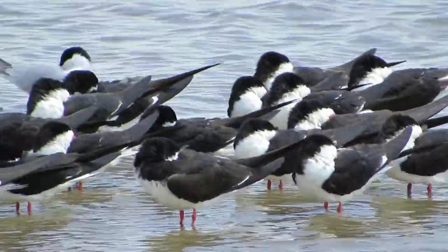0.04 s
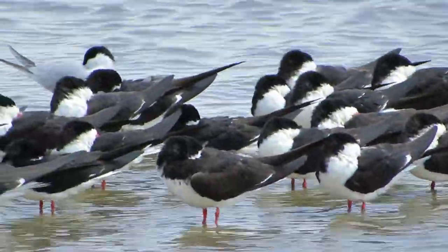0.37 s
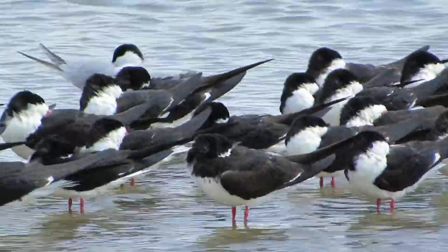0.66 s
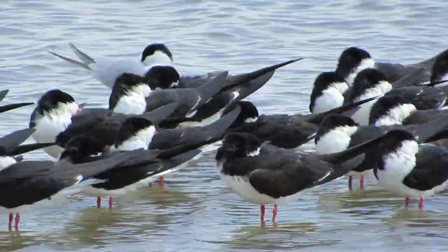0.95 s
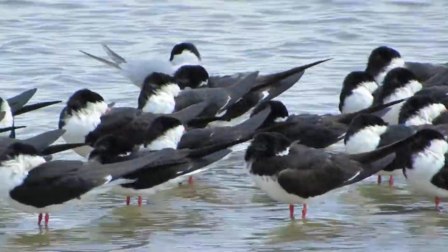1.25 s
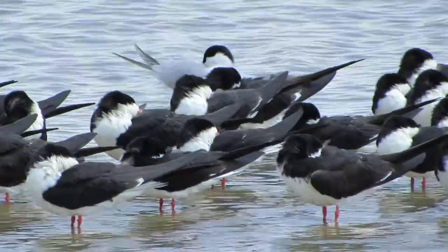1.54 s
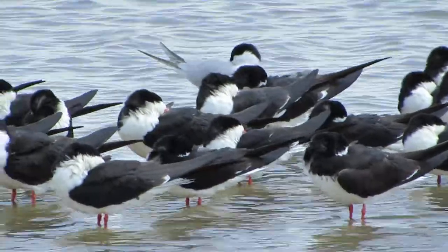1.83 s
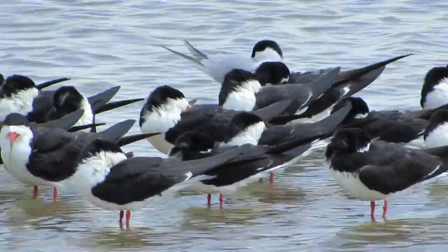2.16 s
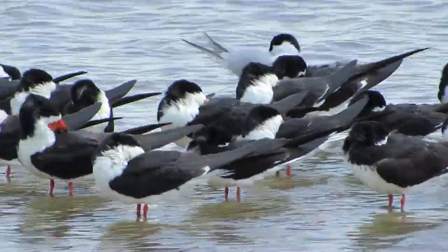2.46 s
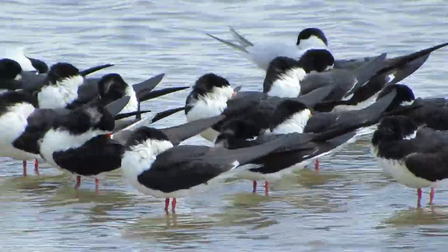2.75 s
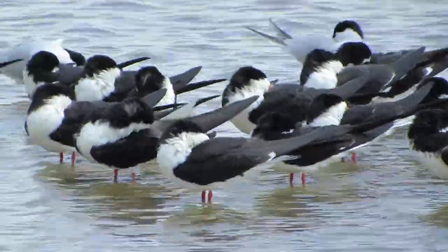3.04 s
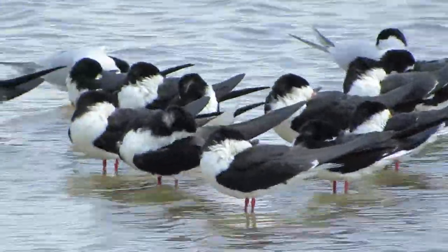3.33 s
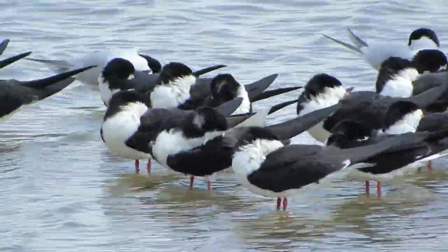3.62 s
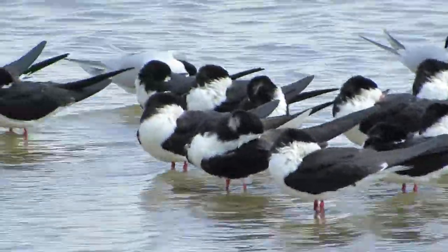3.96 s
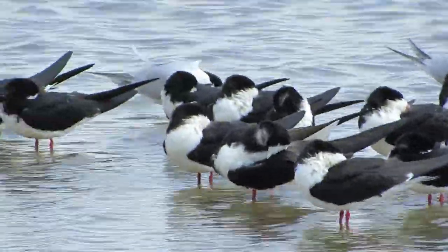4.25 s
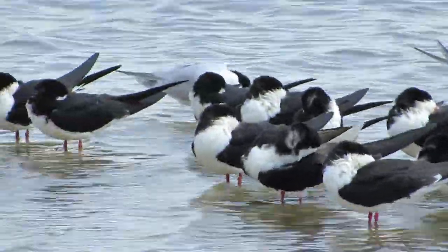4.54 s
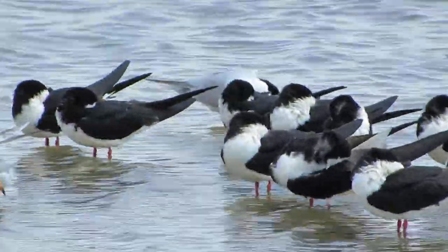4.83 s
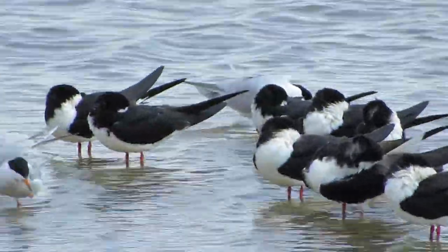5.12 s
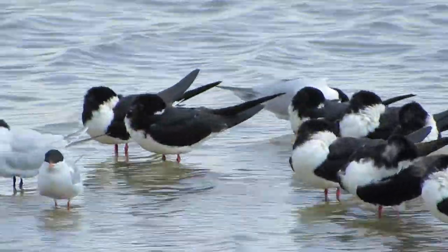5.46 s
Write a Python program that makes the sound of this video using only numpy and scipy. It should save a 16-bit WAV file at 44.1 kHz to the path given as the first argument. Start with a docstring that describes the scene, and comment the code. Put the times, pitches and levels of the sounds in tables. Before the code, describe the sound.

Gusty wind rumbles and thumps on the microphone while terns give quiet, sharp kips and short cries over a faint watery hiss.

```python
"""Terns, close and straight ahead, call in sharp kips, drawn-out cries and a wail over a skimmer roost
in shallow water; each call is a harmonic stack shaped by throat and bill. Short pure tones sound near
2.7 kHz, some faint and alone, some with the calls. Right on the camera microphone, gusty wind sweeps
eddies and small snaps over the two ports: the faster the air, the louder and brighter the rumble.
Under it, from all sides, lies a faint hiss with the colour of rippling water."""
import sys
import numpy as np
from scipy import signal
from scipy.fft import rfft, irfft, next_fast_len
from scipy.io import wavfile
from scipy.ndimage import uniform_filter1d, minimum_filter1d, map_coordinates

SR = 44100
rng = np.random.default_rng(int(sys.argv[2]) if len(sys.argv) > 2 else 0)


def master_out(mix):
    """Clip the mix to full scale and print it as 16-bit PCM to the path in sys.argv[1]."""
    frames = np.transpose(np.atleast_2d(mix))
    ceiling = np.clip(frames, -1, 1)
    pcm = np.round(ceiling * 32767).astype(np.int16)
    wavfile.write(sys.argv[1], SR, pcm)


N = 250929

# Levels in the tables are relative, ahead of each source's gain and the microphone.
# the breeze at the microphone: (time [s], air speed as eddies passing per second [Hz])
BREEZE = [(0.0, 559.2), (0.135, 284), (0.24, 450.9), (0.32, 476), (0.37, 350.2), (0.52, 390.8),
          (0.68, 393.9), (0.75, 305.5), (0.85, 385.3), (0.925, 303.6), (0.98, 409.1), (1.06, 411.1),
          (1.29, 338.7), (1.47, 323.2), (1.53, 387.6), (1.63, 316.2), (1.78, 245.5), (1.85, 249.9),
          (1.89, 370.3), (1.97, 335.3), (2.02, 174.5), (2.13, 310.1), (2.22, 206.3), (2.38, 341.7),
          (2.46, 209.9), (2.57, 190.5), (2.7, 280.9), (2.92, 306.1), (3.02, 359.5), (3.24, 279.5),
          (3.35, 255.2), (3.43, 336.2), (3.73, 355), (3.96, 313), (4.23, 316), (4.265, 155), (4.37, 134.9),
          (4.45, 285.1), (4.82, 315.1), (4.89, 204.8), (4.98, 205), (5.05, 270.2), (5.17, 330.1),
          (5.29, 479.8), (5.35, 384.5), (5.415, 344.8), (5.47, 380.3), (5.54, 279.5), (5.59, 389.5),
          (5.64, 291), (5.69, 343.4)]
# buffets that thump the microphone: (start [s], air speed factor [ratio], length [s])
BUFFETS = [(0.093, 1.34, 0.01), (0.22, 1.16, .01), (0.26, 1.17, 0.017), (0.298, 1.3, 0.036),
           (0.685, 1.18, 0.011), (0.844, 1.42, 0.011), (0.963, 1.096, 0.014), (0.983, 1.27, 0.017),
           (1.243, 1.32, 0.0096), (1.36, 1.35, 0.054), (1.56, 1.3, 0.024), (1.738, 1.57, .013),
           (1.83, 1.4, 0.0082), (1.866, 1.45, 0.025), (1.949, 1.3, 0.022), (2.112, 1.15, .01),
           (2.136, 1.35, 0.0086), (2.597, 1.67, 0.02), (2.644, 1.69, 0.038), (2.696, 1.16, .022),
           (2.751, 1.555, 0.013), (2.818, 1.6, 0.034), (2.972, 1.283, 0.012), (3.016, 1.09, .012),
           (3.068, 1.125, 0.015), (3.126, 1.41, 0.017), (3.175, 1.377, 0.031), (3.273, 2.09, 0.0082),
           (3.286, 1.41, 0.023), (3.6, 1.3, 0.0094), (3.631, 1.25, .012), (3.739, 1.285, 0.029),
           (3.793, 1.16, 0.011), (3.886, 1.58, 0.017), (3.928, 1.53, 0.01), (4.017, 1.59, 0.02),
           (4.061, 1.35, 0.013), (4.166, 1.486, 0.0086), (4.208, 1.2, 0.023), (4.436, 1.23, 0.012),
           (4.59, 1.18, .012), (4.653, 1.514, 0.0073), (4.743, 1.3, 0.025), (4.785, 1.155, .02),
           (4.829, 1.64, 0.018), (4.851, 1.48, .014), (5.106, 1.197, 0.027), (5.375, 1.4, 0.029),
           (5.429, 1.35, 0.0062), (5.466, 1.34, 0.03), (5.564, 1.44, 0.038), (5.677, 1.37, 0.0083)]
# large eddies boom, small ones hiss: (time [s], size against the usual eddy [ratio])
EDDY_SIZE = [(0, 0.86), (.25, 1.06), (.42, 0.87), (.9, 0.99), (1.92, 1.045), (2.67, 0.92), (2.83, 1.246),
             (3.1, 1.087), (3.35, 1.047), (3.6, 1.054), (4.36, .95), (4.66, 1.108), (4.9, 0.91),
             (5.35, 1.204), (5.52, 0.88)]
# pressure of the turbulence at the base flow: (frequency [Hz], density [dB])
TURBULENCE_SPECTRUM = [(20, 0.5), (70, -2.5), (150, -0.5), (280, -6), (450, -11), (700, -20), (1100, -34),
                       (1700, -56), (2600, -90), (4000, -92.5), (7000, -120)]
# a tiny whirl breaking on the rim of a port: (frequency [Hz], density [dB])
SPIT_SPECTRUM = [(100, -12.5), (400, 14), (800, 10), (1300, -3.5), (2100, -18), (3100, -36), (3800, -49.5),
                 (5500, -69.5), (7000, -97.5)]
# the deep rumble under the gusts: (time [s], level [dB])
DEEP_LEVEL = [(0, -15), (.15, -31), (.27, -16), (.4, -37), (.52, -37.5), (.7, -20), (1.05, -22),
              (1.25, -26.5), (1.4, -22), (1.7, -25.5), (1.78, -34), (1.93, -22.5), (2.04, -29.5),
              (2.68, -23), (2.88, -22.5), (3.45, -23), (3.63, -23), (4.13, -21), (4.34, -34), (4.69, -20),
              (4.92, -37), (5.38, -18.5), (5.53, -28), (5.69, -20)]
# the slow sway of air pressure at the ports: (frequency [Hz], density [dB])
DEEP_SPECTRUM = [(15, -25.5), (30, -7), (55, -1.5), (85, -2), (115, -4.5), (160, -16), (300, -54.5),
                 (600, -120)]
# the faint background hiss, which swells slowly and drops near the end: (time [s], level [dB])
HISS_LEVEL = [(0, -71), (2.402, -68.5), (3.299, -66.5), (5.199, -66), (5.38, -64), (5.43, -69.5)]
# rippling water and distant shore: (frequency [Hz], density [dB])
WASH_SPECTRUM = [(30, 10.5), (150, 18.5), (400, 10), (1000, 4), (2500, -8.5), (3400, -14), (4300, -17.5),
                 (6000, -15), (8500, -20.5), (12000, -19), (14000, -37.5)]
# hard snaps at the crests of the buffets: (time [s], level [dB])
SNAPS = [(.026, -15), (.274, -22), (.309, -16), (.318, -9), (.339, -20), (.535, -29), (.645, -34),
         (.686, -29), (.851, -16.5), (.979, -22.5), (.99, -16), (1.574, -15.5), (1.954, -23.5),
         (2.137, -34.5), (2.845, -27.5), (3.276, -23), (3.632, -29), (3.752, -28), (3.794, -28),
         (3.89, -22.5), (3.937, -24), (4.023, -26.5), (5.379, -15.5), (5.4, -25), (5.432, -24),
         (5.477, -24), (5.487, -26), (5.581, -7.5), (5.59, -16), (5.683, -20)]
# the colour of a snap: (frequency [Hz], density [dB])
SNAP_SPECTRUM = [(100, -30.5), (300, -9), (700, 4), (1300, -1), (2100, -17), (3100, -34), (4000, -47.5),
                 (7000, -66), (12000, -85)]
# resonances of a tern's throat and open bill: (frequency [Hz], gain [dB])
THROAT = [(700, -23), (1400, -1.5), (1900, 3), (2300, 7), (2800, 5), (3150, -1.5), (3350, -1), (3650, 7.5),
          (3950, -10), (4250, 3.5), (4550, 1.5), (4800, 3.5), (5500, 5), (6150, -5.5), (6450, -14.5),
          (7300, -14), (8500, -15), (9500, -21), (12000, -20.5), (13500, -29.5)]
# near kips: (time of top [s], top pitch [Hz], level [dB], brightness [dB], tail against kip [dB])
KIPS = [(0.033, 1067, -64.5, 2.5, -20), (0.942, 981, -68.5, 2.5, -17), (1.507, 776.6, -68, 5.5, -14),
        (1.614, 923.6, -64, -2, -27), (1.811, 806.7, -70, 3.5, -28), (1.916, 918.3, -63.5, -5, -28.5),
        (2.352, 942, -65, -5, -11), (3.288, 944.4, -60, 0, -12), (3.864, 706, -71, 2.5, -19),
        (4.241, 801.6, -68, 3.5, -16), (4.347, 921.4, -61.5, -4.5, -35), (4.738, 906.5, -65, -4.5, -15)]
# the tail off the open shore: (frequency [Hz], time to fall 60 dB [s])
SHORE_DECAY = [(500, .3), (2500, 0.37), (9000, 0.056)]
# near cries that climb slowly and plunge:
# (time of top [s], rise [s], top pitch [Hz], level [dB], low partials [dB], high ones [dB], sheen [dB])
CRIES = [(0.171, 0.048, 1073, -74.5, 12.5, -12.5, 19), (1.096, 0.043, 995, -70.5, 2, -23.5, 15),
         (2.519, 0.056, 1022, -70, 9, -18.5, 7), (3.45, 0.061, 988.2, -63, 5, -21, 11),
         (3.974, 0.034, 1060, -83.5, 14, -14, -2), (4.899, 0.058, 984.6, -68, 8, -15.5, 6)]
# single large eddies on the microphone: (time [s], pitch [Hz], level [dB])
THUDS = [(.245, 75, -23), (0.303, 291, -7), (.88, 80, -14.5), (.972, 138.4, -2), (1.565, 260.2, -4),
         (2.31, 240, -21), (2.39, 70.08, -11.5), (2.607, 250.4, -7.5), (2.85, 68.85, -5.5),
         (2.869, 189.5, -18.5), (3.15, 65, -7), (3.294, 60.13, -7.5), (3.414, 79.43, -5),
         (3.888, 169.1, -3.5), (4.064, 242.4, -3), (4.657, 259.2, -8), (4.70, 74.8, -15),
         (5.383, 269.9, -19), (5.582, 239.6, -10.5)]
# short pure tones near 2.7 kHz, some faint and alone, some sounding with the near calls:
# (time of top [s], pitch [Hz], level [dB])
PURE_TONES = [(.784, 2638, -84), (1.282, 2637, -84), (1.732, 2600, -87.5), (1.835, 2662, -80),
              (2.1, 2611, -84), (2.885, 2600, -80), (3.126, 2690, -86), (3.406, 2663, -68.5),
              (3.642, 2696, -81), (3.876, 2778, -70), (4.056, 2766, -78), (4.169, 2700, -84),
              (4.406, 2679, -97.5), (4.627, 2776, -78.5), (4.813, 2770, -74), (4.955, 2659, -84),
              (5.148, 2719, -76)]
# one near, slurred wail: (time [s], pitch [Hz], level [dB], high partials [dB])
WAIL = [(2.6, 961.6, -90.5, -9.5), (2.627, 1068, -70, -15), (2.655, 999, -80.5, -13), (2.687, 876, -79, -9),
        (2.735, 1006, -78.5, -6), (2.775, 1022, -72, -8), (2.81, 983, -79, -3.5), (2.84, 805, -85.5, -6)]
# faint, dry ticks: (time [s], level [dB])
TICKS = [(5.339, -57), (5.45, -57), (5.629, -57), (5.655, -54)]
# the colour of a tick: (frequency [Hz], density [dB])
TICK_SPECTRUM = [(1000, -10.5), (4000, 1), (8000, -8.5), (13000, -14)]


def amp(db):
    """Decibels to gain."""
    return 10 ** (np.asarray(db) / 20)


def unit(x):
    """Scale to rms 1."""
    return x / np.sqrt(np.mean(x ** 2) + 1e-20)


def along(points, hz):
    """(frequency [Hz], value) points read on a log axis."""
    f, v = np.transpose(points)
    return np.interp(np.log(hz + 1), np.log(f + 1), v)


def curves(rows):
    """One value per sample for each column after the time."""
    times, *columns = np.transpose(rows)
    return [np.interp(np.arange(N) / SR, times, column) for column in columns]


def wobble(rate, size=N):
    """A smooth random curve, rate knots a second."""
    knots = rng.standard_normal(size // 16 + 8)
    return map_coordinates(knots, [np.arange(size) * rate / SR], mode="wrap")


def filtered(x, response):
    """x through a filter, given as gain against frequency."""
    m = next_fast_len(x.shape[-1] + 8192)
    return irfft(rfft(x, m) * response(np.fft.rfftfreq(m, 1 / SR)), m)[..., :x.shape[-1]]


def noise(spectrum, size=N):
    """Two unrelated noises of rms 1 with the given colour."""
    return unit(filtered(rng.standard_normal((2, size)), lambda hz: amp(along(spectrum, hz))))


def clicks(rows, spectrum):
    """Single pressure spikes of one colour, each at its own peak level."""
    hits = np.zeros(N)
    for at, db in rows:
        hits[round(at * SR)] = amp(db)
    colour = lambda hz: amp(along(spectrum, hz))
    return filtered(hits, lambda hz: colour(hz) / colour(hz).mean())


def arch(top, rise, fall):
    """The samples of a note and their place in it: -1 on the way up, 0 at the top, 1 on the way down."""
    i = np.arange(max(0, int((top - 2 * rise) * SR)), min(N, int((top + 2 * fall) * SR)))
    t = i / SR - top
    return i, t / np.where(t < 0, rise, fall)


def at_ports(a, b, mid_db=-15, mid_rise_hz=620):
    """The microphone makes stereo from the difference of two close ports: wind is in opposite phase."""
    side = (a - b) / np.sqrt(2)
    mid_gain = lambda hz: np.minimum(amp(mid_db) * np.hypot(1, hz / mid_rise_hz), 1)
    mid = filtered((a + b) / np.sqrt(2), mid_gain)
    return np.array([mid + side, mid - side])


def flurries(per_second=48, width_s=.0024, most=.32):
    """Small hard eddies hit both ports at random moments; their surge in log speed."""
    t = np.arange(-SR // 50, SR // 50) / SR
    hits = (rng.random(N) < per_second / SR) * rng.uniform(.5, 1, N)
    return most * np.tanh(signal.fftconvolve(hits, np.exp(-.5 * (t / width_s) ** 2), "same"))


def air_speed(base_hz=400, attack_s=.00199, release_s=.005027, overshoot=.13, kick_s=.005, unrest=.06):
    """Speed against the base flow: breeze, buffets that strike, hold and let go, and flurries."""
    t = np.arange(N) / SR
    eddy_hz, = curves(BREEZE)
    breeze = eddy_hz / base_hz
    step = lambda u: .5 + .5 * np.tanh(u)
    surge = np.zeros(N)
    for at, factor, length in BUFFETS:
        kick = overshoot * np.exp(-((t - at) / kick_s) ** 2)
        held = step((t - at) / attack_s) * step((at + length - t) / release_s)
        surge += (np.log(factor) + kick) * held
    # flurries fade in lulls and merge into fast air
    stir = flurries() * np.minimum(breeze / .65, 1) ** 2 / np.maximum(breeze, 1) ** 2
    return breeze * np.exp(np.hypot(surge, stir) + unrest * wobble(rate=70))


def eddy_size(swell=.075, lump=.0687):
    """Larger and smaller eddies drift by, so the bass swells and thuds on its own."""
    size, = curves(EDDY_SIZE)
    return size * np.exp(swell * wobble(rate=11) + lump * wobble(rate=55))


def spits(per_second=520, scatter_db=7.5):
    """Tiny whirls break on the rim of a port in snaps of uneven size; rms 1."""
    hits = (rng.random(N) < per_second / SR) * rng.choice([-1, 1], N)
    sizes = amp(scatter_db * np.clip(rng.standard_normal(N), -2, 2))
    return unit(filtered(hits * sizes, lambda hz: amp(along(SPIT_SPECTRUM, hz))))


def wind(port_drag=.97, flutter=.23, knee_speed=1.7, spit_db=-30, gain_db=-16, low_cut_hz=105):
    """Air carries a frozen field of eddies past each port; its speed sets the pitch and force."""
    speed = port_drag * air_speed()
    size = eddy_size()
    push = uniform_filter1d(np.clip(speed, .38, 1.8), size=90)  # levels off in lulls and hard buffets
    ports = []
    for field in noise(TURBULENCE_SPECTRUM, size=2 * N):
        whirls = np.exp(flutter * np.tanh(wobble(rate=200) / 2))  # each port meets its own
        passing = speed * whirls / size
        # the hardest gusts grow louder, hardly higher
        passing /= np.sqrt(np.hypot(1, (passing / knee_speed) ** 2))
        rumble = map_coordinates(field, [np.cumsum(passing)], mode="wrap")
        crackle = amp(spit_db) * spits() * np.minimum(speed / size, 1.75) ** 5  # fast air spits harder
        ports.append((rumble + crackle) * (push * whirls) ** 1.72 * size ** 1.82)
    stereo = amp(gain_db) * at_ports(*ports)
    return filtered(stereo, lambda hz: hz ** 3 / np.hypot(hz ** 3, low_cut_hz ** 3))


def deep_rumble():
    """Slow, wide swirls of air heave at the microphone under the gusts."""
    db, = curves(DEEP_LEVEL)
    return at_ports(*noise(DEEP_SPECTRUM) * amp(db))


def background_hiss(width=.93):
    """A faint wash from all sides; its level swells slowly and drops near the end."""
    db, = curves(HISS_LEVEL)
    mid, side = noise(WASH_SPECTRUM) * amp(db)
    return np.array([mid + width * side, mid - width * side])


def snaps(far_port=-.14):
    """The hardest whirls crack on the rim of one port."""
    crack = clicks(SNAPS, SNAP_SPECTRUM)
    return at_ports(crack, far_port * crack)


def contour(t, rise, fall, droop=.31, fade_db=12):
    """Pitch ratio, gain and depth of the plunge of an arching note, t seconds from its top."""
    half = np.where(t < 0, rise, fall)
    u = t / half
    haste = (.036 / half) ** .14  # slow slopes sag less
    bend = 1 - droop * haste * u ** 2 / np.hypot(1, u ** 2 / 2)
    return bend, amp(-fade_db * np.abs(u) ** 3), np.clip(u, 0, 1) ** 1.5


def tern_voice(hz, low_db, high_db, plunge, sheen_db=0, jitter=.003, rasp=.21, plunge_rasp=.5):
    """A harmonic stack through a tern's throat and bill; as the pitch plunges it turns hoarse."""
    k = np.arange(1, 14)[:, None]
    # the bill is already set for the top pitch on the way up
    place_hz = k * np.maximum.accumulate(hz[::-1])[::-1]
    low = np.clip((2400 - place_hz) / 250, 0, 1)
    high = np.clip((place_hz - 3200) / 400, 0, 1)  # falling partials slide into the strong middle band
    tilt_db = low_db * low + high_db * high + 2 * (high - low) * plunge
    bill_db = sheen_db * np.exp(-.5 * ((k * hz - 8100) / 1000) ** 2)  # the wide-open bill resonates
    hz = hz * (1 + jitter * (1 + 2 * plunge) * wobble(rate=1200, size=len(hz)))
    phase = 2 * np.pi * np.cumsum(hz) / SR
    partial_db = along(THROAT, np.abs(k * hz)) + tilt_db + bill_db
    stack = np.sqrt(2) * np.sum(amp(partial_db) * np.sin(k * phase), axis=0)
    return stack * (1 + (rasp + plunge_rasp * plunge) * wobble(rate=1100, size=len(hz)))


def kips(rise_s=.022, fall_s=.025, tail_after_s=.033, tail_rise_s=.028, tail_fall_s=.039, tail_ratio=.7):
    """Near terns call in quick, even arches; each slides without a break onto a lower tail note."""
    out = np.zeros(N)
    for top, pitch, db, bright_db, tail_db in KIPS:
        i, _ = arch(top, rise_s, tail_after_s + tail_fall_s / 2)
        t = i / SR - top
        bend, gain, plunge = contour(t, rise_s, fall_s)
        tail_bend, tail_gain, _ = contour(t - tail_after_s, tail_rise_s, tail_fall_s)
        hz = pitch * uniform_filter1d(np.maximum(bend, tail_ratio * tail_bend), size=200)
        call = tern_voice(hz, low_db=-2.5 - .57 * bright_db, high_db=-12 + bright_db,
                          plunge=plunge * np.sqrt(gain), sheen_db=.8 * bright_db)
        out[i] += amp(db) * call * np.hypot(gain, amp(tail_db) * tail_gain)
    return out


def echo(x, delay_s=.008, echo_db=-19):
    """The call with one early reflection, which beats against it wherever the pitch moves fast."""
    return filtered(x, lambda hz: 1 + amp(echo_db) * np.exp(-2j * np.pi * hz * delay_s))


def shore(x, near_db=-19, near_t60_s=.16, far_db=-25):
    """Nearby ripples scatter the calls at once; the open shore adds a thin, longer tail."""
    hz, t, bands = signal.stft(rng.standard_normal((2, SR // 2)), SR, nperseg=256)
    decay = amp(-60 * t / along(SHORE_DECAY, hz)[:, None])
    _, tail = signal.istft(bands * decay, SR, nperseg=256)
    scatter = rng.standard_normal(tail.shape) * amp(-60 * np.arange(tail.shape[1]) / SR / near_t60_s)
    near = amp(near_db) * scatter / np.linalg.norm(scatter[0])
    far = amp(far_db) * tail / np.linalg.norm(tail[0])
    delayed = np.pad(x, (130, 0))  # about 3 ms
    return signal.fftconvolve(delayed[None], near + far, axes=1)[:, :N]


def cries(fall_s=.025, push_db=4):
    """Mellower tern notes with a long climb, pushed harder in the rounded, hoarse fall."""
    out = np.zeros(N)
    for top, rise_s, pitch, db, low_db, high_db, sheen_db in CRIES:
        i, _ = arch(top, rise_s, fall_s)
        bend, gain, plunge = contour(i / SR - top, rise_s, fall_s)
        call = tern_voice(pitch * bend, low_db, high_db, plunge, sheen_db)
        out[i] += amp(db + push_db * plunge) * gain * call
    return out


def thuds(half_cycles=1.626, wander=.29, far_port=-.095):
    """A large eddy shoves one port for a cycle or two and draws on the other."""
    out = np.zeros(N)
    for at, hz, db in THUDS:
        i, u = arch(at, half_cycles / hz, half_cycles / hz)
        cycles = rng.random() + np.cumsum(hz * np.exp(wander * wobble(hz, size=len(i)))) / SR
        out[i] += amp(db) * np.exp(-2 * u ** 2) * np.sin(2 * np.pi * cycles)
    return at_ports(out, far_port * out)


def pure_tones(half_s=.024, droop=.03, fade_db=6, waver=.003):
    """Short sine tones, nearly level in pitch, sound alone or with the near calls."""
    out = np.zeros(N)
    for top, pitch, db in PURE_TONES:
        i, u = arch(top, half_s, half_s)
        hz = pitch * (1 - droop * u ** 2 + waver * wobble(rate=260, size=len(i)))
        out[i] += np.sqrt(2) * amp(db - fade_db * u ** 2) * np.sin(2 * np.pi * np.cumsum(hz) / SR)
    return out


def wail():
    """A near tern's clear call dips and rises again without a break."""
    hz, db, high_db = curves(WAIL)
    i = np.arange(int(WAIL[0][0] * SR), int(WAIL[-1][0] * SR))
    call = tern_voice(hz[i], low_db=5.5, high_db=high_db[i], plunge=0)
    out = np.zeros(N)
    out[i] = call * amp(db[i]) * signal.windows.tukey(len(i), .1)
    return out


def ticks():
    """Thin, dry ticks, dead centre, follow the last gust."""
    return clicks(TICKS, TICK_SPECTRUM)


def scene():
    """At the roost: terns straight ahead, faint hiss all round, wind on the microphone."""
    terns = amp(-2.5) * (kips() + cries() + wail())
    calls = echo(terns) + pure_tones()
    direct = calls * amp([[-.8], [.8]])  # a touch right of centre
    roost = direct + shore(calls) + background_hiss()
    return roost + wind() + deep_rumble() + thuds() + snaps() + ticks()


def record(dry, ceiling=.92, top_hz=13700):
    """A smooth gain holds the highest peaks just under full scale; nothing is kept above the camera's band
    limit."""
    needed = np.minimum(1, ceiling / (np.abs(dry).max(axis=0) + 1e-9))
    held = minimum_filter1d(needed, size=500)
    gain = uniform_filter1d(uniform_filter1d(held, size=250), size=250)
    return signal.sosfilt(signal.cheby1(12, .2, top_hz, fs=SR, output="sos"), dry * gain)


dry = scene()
out = record(dry)
master_out(out)
```